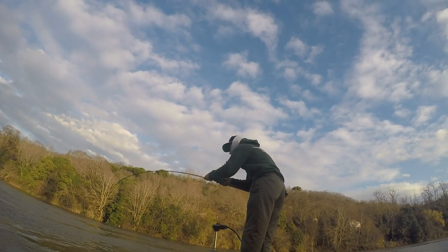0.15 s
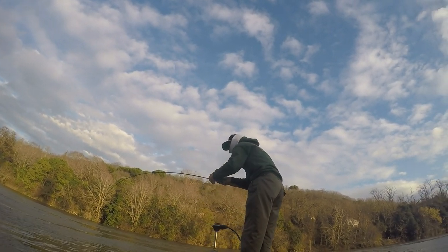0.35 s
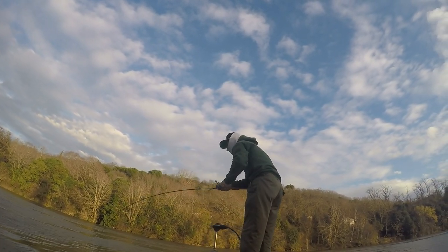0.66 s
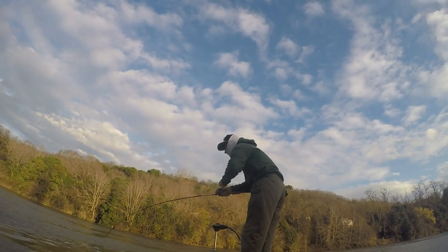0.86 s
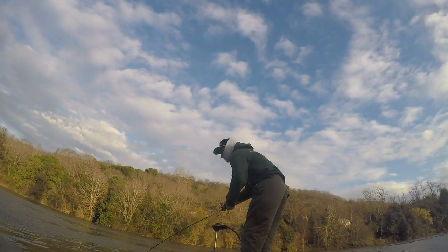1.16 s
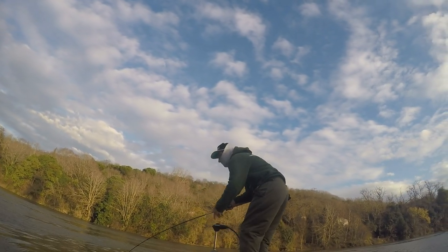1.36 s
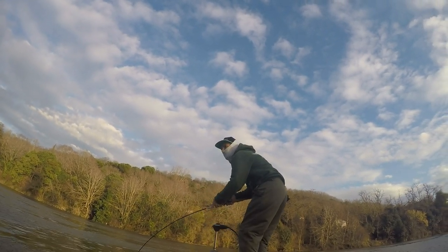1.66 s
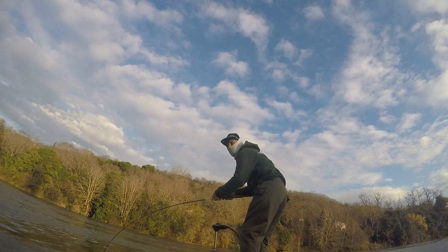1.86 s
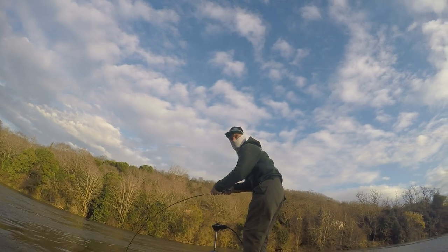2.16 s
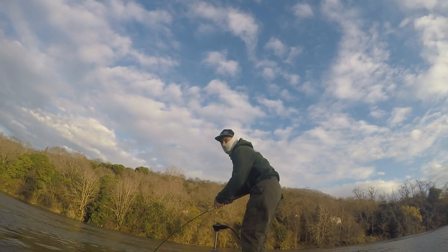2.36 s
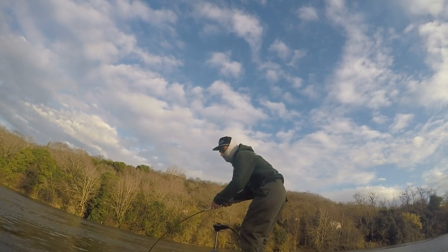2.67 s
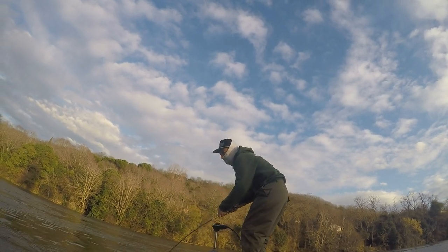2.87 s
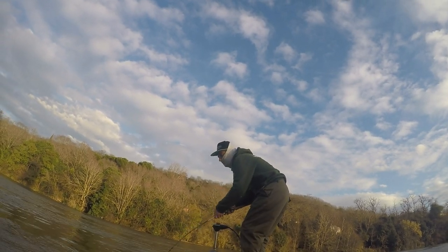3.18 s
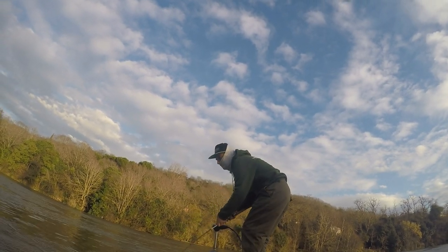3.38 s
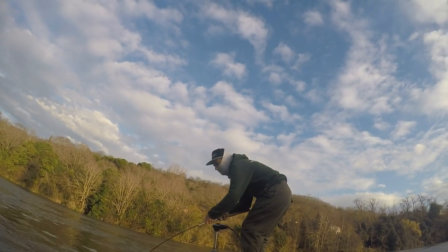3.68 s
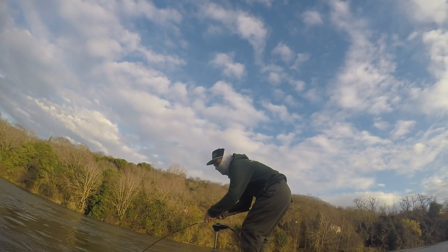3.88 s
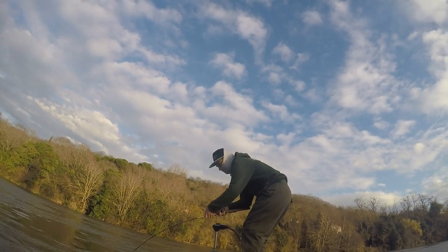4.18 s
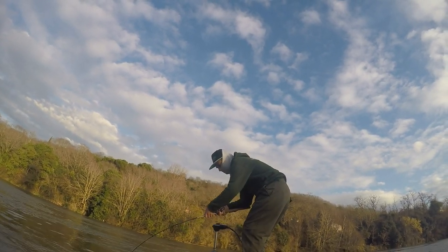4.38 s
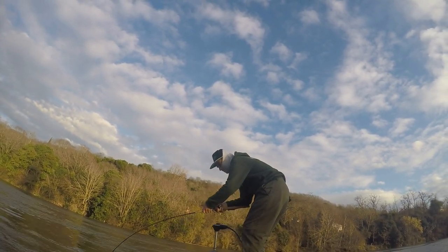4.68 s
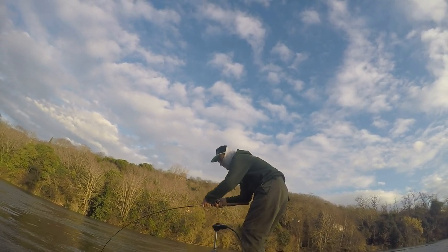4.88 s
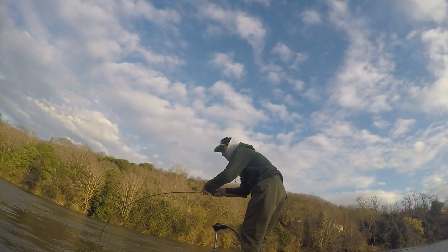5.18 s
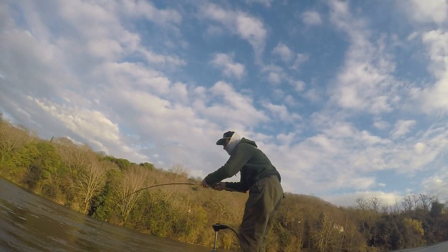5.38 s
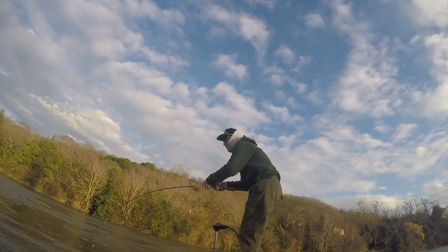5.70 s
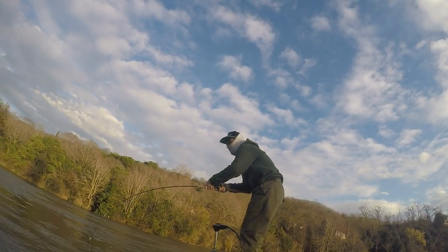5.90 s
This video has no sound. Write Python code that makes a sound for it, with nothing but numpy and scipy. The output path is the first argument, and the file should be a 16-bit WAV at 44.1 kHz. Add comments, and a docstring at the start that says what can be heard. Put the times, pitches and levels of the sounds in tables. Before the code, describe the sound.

Close to a microphone sealed in a case on a boat, a fishing reel whirs in uneven grinding surges, its metal gears clicking densely. Around two seconds it falters into short clicks and ticks. A low mount hum wavers beneath, and knocks and a deep thump travel through the hull. A quiet stretch of soft river wash and hiss follows, then a late cluster of thumps as weight shifts.

```python
"""A baitcasting reel is cranked in a small boat on a river, heard by a camera in a closed case on a hull mount.
Its gears whirr in surges, then falter and stop: random tooth clicks ring the frame and side plates.
The line guide ticks, the mount hums as a wavering sine, and the hull shakes under the angler.
Knocks travel along the hull, treble first. Coloured noise makes the far river and road wash and the hiss."""
import sys
import numpy as np
from scipy import signal
from scipy.io import wavfile
from scipy.ndimage import uniform_filter1d

SR = 44100
rng = np.random.default_rng(int(sys.argv[2]) if len(sys.argv) > 2 else 0)


def log_audio(samples):
    """Write samples as a 16-bit WAV file to the path given in sys.argv[1]."""
    # one column per channel
    frames = np.atleast_2d(samples).T
    # limit to full scale, then quantise
    limited = np.clip(frames, -1, 1)
    pcm = np.round(limited * 32767).astype(np.int16)
    wavfile.write(sys.argv[1], SR, pcm)


N = 266628
T = np.arange(N) / SR  # time of every sample in seconds


def amp(db):
    """Turns dB into a gain."""
    return 10 ** (np.asarray(db) / 20)


def evened(x):
    """Scales a sound to an rms of 1."""
    return x / np.sqrt(np.mean(x ** 2) + 1e-20)


def follow(rows):
    """Joins rows of (seconds, dB) into a gain for every sample, practically silent outside their span."""
    s, db = np.transpose(rows)
    return amp(np.interp(T, s, db, left=-120, right=-120))


def add(mix, s, sound):
    """Lays a sound into the mix at s seconds."""
    start = max(round(s * SR), 0)
    part = mix[start:][:len(sound)]
    part += sound[:len(part)]


def resonate(x, hz, width):
    """A resonance of gain 1: shifts hz down to zero, smooths, and shifts back."""
    turn = np.exp(2j * np.pi * hz * np.arange(len(x)) / SR)
    r = np.exp(-np.pi * width / SR)
    smooth = signal.lfilter([1 - r], [1, -r], x / turn)
    return 2 * (turn * smooth).real


def drift(per_s):
    """Slow random wandering of rms 1: noise kept below per_s Hz."""
    b, a = signal.butter(2, per_s, fs=SR)
    return evened(signal.lfilter(b, a, rng.standard_normal(N)))


def noise(tone, patchy_db, size=1024):
    """Noise of rms 1 from random short-time spectra of the given colour, with drifting patches."""
    hz = np.fft.rfftfreq(size, 1 / SR)
    a, b, patches = rng.standard_normal((4 * N // size + 5, len(hz), 3)).T
    # smooth over neighbouring pitches, then over time
    patches = uniform_filter1d(patches, size=8, axis=0)
    patches = evened(uniform_filter1d(patches, size=10, axis=1))
    f, db = np.transpose(tone)
    colour_db = np.interp(np.log(hz + 1), np.log(f), db, left=-120, right=-120)
    spectra = (a + 1j * b) * amp(colour_db[:, None] + patchy_db * patches)
    sound = signal.istft(spectra, nperseg=size, noverlap=3 * size // 4)[1]
    return evened(sound[:N])


def body(x, modes):
    """A solid part rings at its modes: steep resonances of alternating sign; white noise keeps its level."""
    tick = np.arange(SR // 4) == 0
    ring = np.zeros(len(tick))
    for k, (hz, width, db) in enumerate(modes):
        # two passes make the resonance steep
        mode = resonate(resonate(tick, hz, width), hz, width)
        ring += (-1) ** k * amp(db) * evened(mode)
    return signal.oaconvolve(x, ring / np.linalg.norm(ring))[:N]


def contacts(per_s, spread_db):
    """Dense uneven clicks at random moments, per_s a second on average, scaled to rms 1."""
    size = amp(spread_db * np.minimum(rng.exponential(1, N), 5))
    size = size * rng.choice([-1., 1.], N)
    return evened(size * (rng.random(N) < per_s / SR))


def bursts(s, db, t60, rise):
    """A level that rises at each event and dies away, by 60 dB in t60 seconds."""
    level, t = np.zeros(N), np.arange(SR // 2) / SR
    for at, start_db, tail, up in np.broadcast(s, db, t60, rise):
        add(level, at, amp(start_db - 60 * t / tail) * (1 - np.exp(-t / up)))
    return level


def strikes(s, db):
    """One single-sample click at each event."""
    out = np.zeros(N)
    out[np.round(np.asarray(s) * SR).astype(int)] = amp(db)
    return out


def knock(rub, s, db, t60, rise, blow_db):
    """A first blow, stronger the sharper the contact, the contact itself, and a weaker, longer rattle."""
    blow = strikes(s, db + blow_db) * 0.0011 / np.interp(T, s, rise)
    contact = bursts(s, db, t60, rise)
    rattle = bursts(s, db - 17.5, 2.5 * t60, rise=0.03)
    return blow + rub * (contact + rattle)


def outdoors():
    """Far wash and microphone hiss are coloured noise; the camera electronics whine on one faint tone."""
    # Strength of the far wash. Each row: time in seconds, level in dB.
    wash_level = [(0.0, -57.5), (1.51, -52.5), (1.97, -58.5), (6.05, -58.5)]
    # Colour of the wash through the case. Each row: pitch in Hz, relative strength in dB per Hz.
    wash_tone = [(210, -2), (350, -7), (490, -10.5), (526, -14.5), (613, -17.5), (707, -18.5), (767, -11.5),
                 (960, -1.5), (1290, -12.5), (1660, -8), (2240, -16), (2450, -13.5), (4000, -36.5),
                 (5200, -49), (8800, -120)]
    # Colour of the microphone hiss. Each row: pitch in Hz, relative strength in dB per Hz.
    hiss_tone = [(1470, -19), (2500, -6), (3070, -0.5), (3860, -5), (6240, -7), (9140, -12.5), (14700, -16),
                 (15500, -28)]
    hiss_db, whine_db = -68.5, -87.5
    wash = follow(wash_level) * noise(wash_tone, .6)
    hiss = amp(hiss_db) * noise(hiss_tone, 0.29, size=512)
    whine = evened(resonate(rng.standard_normal(N), hz=8620, width=44))
    return wash + hiss + amp(whine_db) * whine


def mount():
    """The mount keeps ringing at its own pitch, wavering in level and phase, over deep rocking noise."""
    # Strength of the hum before it wavers. Each row: time in seconds, level in dB.
    hum_level = [(0.0, -43.5), (0.09, -28.5), (0.28, -28), (0.35, -37), (0.43, -23), (0.51, -32),
                 (0.6, -26), (0.69, -29), (0.76, -41), (0.82, -33), (1.16, -35), (1.35, -31), (1.46, -48),
                 (1.6, -22.5), (1.7, -25), (1.82, -44.5), (2.1, -42.5), (2.17, -30), (2.43, -39),
                 (2.7, -44.5), (2.92, -29), (3.0, -41), (3.12, -48), (3.3, -39.5), (3.6, -41.5),
                 (3.67, -50), (3.8, -35.5), (4.0, -56), (4.17, -44.5), (4.97, -41.5), (5.08, -57),
                 (5.18, -39.5), (5.3, -51), (5.6, -41), (6.04, -51)]
    # Strength of the deep rocking. Each row: time in seconds, level in dB.
    rock_level = [(0, -40), (.3, -33.5), (1.3, -31.5), (1.7, -38.5), (2.45, -38), (3.0, -36.5), (3.6, -47),
                  (5.3, -47.5), (5.7, -46), (6.05, -37)]
    # Colour of the rocking. Each row: pitch in Hz, relative strength in dB per Hz.
    rock_tone = [(8, -40), (20, -17), (30, -13), (43, -8), (62, -6.5), (72, -13), (95, -36)]
    mount_hz, waver_db, waver_per_s = 77, 1.5, 4.6
    turns = mount_hz * T + 0.29 * drift(1.98)
    hum = np.sqrt(2) * np.sin(2 * np.pi * turns)
    hum = hum * follow(hum_level) * amp(waver_db * drift(waver_per_s))
    return hum + follow(rock_level) * noise(rock_tone, 1.6, size=8192)


def hull():
    """Bending waves carry treble faster than bass, so each knock cracks first and booms after."""
    # Knocks and scuffs on the hull. Each row: start in seconds, level before the soft rise in dB,
    # bright modes in dB and bass in dB against that level, rise time in seconds.
    knocks = [(1.204, -53, -7, -4, .002), (1.546, -44, -5, -18, 0.0076), (1.814, -46, -7.5, 1, 0.0016),
              (2.400, -60.5, 10.5, -13, 0.0023), (2.615, -51.5, -8, 9.5, 0.0015),
              (2.635, -53, 7.5, 21, 0.027), (2.76, -48, 4, -15, 0.014), (2.81, -47, -6, -15, .015),
              (2.883, -30, -6, 1, 0.0035), (2.905, -43, -20, 19, 0.014), (3.0, -39, -13, -8, 0.013),
              (3.262, -53, 3.5, -19, 0.0026), (3.293, -55.5, -7, 2.5, 0.0015),
              (3.338, -53.5, 4.5, -17, 0.0019), (3.496, -40, -10, -31, 0.012),
              (3.959, -45.5, 5.5, -19, 0.019), (5.545, -44, -10, -20, 0.011),
              (5.668, -40.5, -13, 2, 0.0063), (5.699, -52.5, 6, 10, 0.0051),
              (5.807, -43.5, -6.5, 14.5, 0.0023), (5.834, -46.5, -1, 14.5, 0.0043),
              (5.891, -47, -14, 7.5, 0.002), (5.930, -47, -6, 6.5, 0.0031)]
    # Ringing modes of the hull. Each row: pitch in Hz, width of one filter pass in Hz, relative level in dB.
    low_modes = [(150.4, 18.4, -1), (180.7, 18.6, -1.5), (295.5, 72, -8)]
    mid_modes = [(433, 1100, -10), (577, 200, 11.5), (823, 70, -1), (930, 120, 7.5)]
    bright_modes = [(1220, 145, -6.5), (1580, 196, 0), (2030, 47, -11)]
    # The whole hull thumps as weight shifts.
    # Each row: start in seconds, level before the soft rise in dB, rise time in seconds.
    thumps = [(2.342, -13, 0.0073), (2.9, -28, .005), (5.704, -26.5, 0.014), (5.864, -15.5, 0.011),
              (5.97, -18.5, 0.013)]
    # Steady shaking of the hull. Each row: time in seconds, level in dB.
    shake_level = [(0, -45), (1.0, -44), (1.8, -45), (2.8, -50.5), (3.6, -52), (5.4, -53), (6.05, -48)]
    # Colour of the shaking. Each row: pitch in Hz, relative strength in dB per Hz.
    shake_tone = [(60, -12), (100, -8), (135, -18), (178, -8), (216, -26), (290, -19), (400, -35),
                  (600, -28.5), (800, -33), (1300, -35.5), (1800, -49)]
    bass_delay = 0.00473  # s
    thump_hz, thump_t60 = 59.9, 0.31  # Hz, s

    s, db, bright_db, bass_db, rise = np.transpose(knocks)
    t60 = 0.099 + 1.45 * rise  # s; softer contacts last longer
    rub = contacts(6000, spread_db=4.0)
    middle = knock(rub, s, db, t60, rise, blow_db=30)
    bright = knock(rub, s, db + bright_db, t60, rise, blow_db=24.5)
    bass = knock(rub, s + bass_delay, db + bass_db, t60, rise, blow_db=36)
    out = follow(shake_level) * noise(shake_tone, 2.07, size=4096)
    out = out + body(middle, mid_modes) + body(bright, bright_modes) + body(bass, low_modes)
    t = np.arange(SR // 2) / SR
    for at, thump_db, up in thumps:
        swell = amp(thump_db - 60 * t / thump_t60) * (1 - np.exp(-t / up))
        add(out, at, swell * np.sin(2 * np.pi * thump_hz * t))
    return out


def guide():
    """Each line guide tick is a few clicks that ring the guide and carry a wide sharp edge."""
    # Small metal ticks. Each row: start in seconds, level before the soft rise in dB,
    # sharp edge in dB against that level.
    ticks = [(1.498, -60, 7), (1.685, -51, -18), (2.276, -47.5, -15), (2.782, -53.5, -10), (2.85, -55, -17),
             (2.957, -55.5, -16), (3.236, -58, -10), (3.272, -53, -13), (3.336, -52, -12), (3.455, -59, -6),
             (3.4915, -52, -3)]
    # Ringing modes of the guide. Each row: pitch in Hz, width of one filter pass in Hz, relative level in dB.
    guide_modes = [(4700, 820, 2), (7070, 1300, -7)]
    tick_t60 = 0.058  # s
    s, db, edge_db = np.transpose(ticks)
    clicks = contacts(1100, spread_db=2.8)
    edge = bursts(s, db + edge_db, tick_t60, rise=.004) * clicks
    b, a = signal.butter(2, 5500, "high", fs=SR)
    edge = signal.lfilter(b, a, edge)
    ticking = bursts(s, db, tick_t60, rise=0.0058) * clicks + strikes(s, db + 5)
    return body(ticking, guide_modes) + edge


def reel():
    """Tooth contacts ring frame and plates; bites add a click and a short surge, slack cuts the rattle."""
    # Cranking effort. Each row: time in seconds, gear rattle level in dB before drift, bites and slack.
    crank = [(0.0, -55), (0.22, -54.5), (0.35, -42.5), (0.6, -47), (0.95, -43.5), (1.25, -40), (1.4, -43.5),
             (1.68, -47.5), (1.715, -82)]
    # The gears bite. Each row: start in seconds, added rattle before the soft rise in dB,
    # time to die away by 60 dB in seconds.
    bites = [(0.071, -51, 0.34), (0.2853, -42, 0.044), (.322, -47, 0.13), (0.539, -40, 0.12),
             (0.609, -36.5, 0.038), (0.654, -36.5, 0.062), (0.712, -39.5, 0.045), (0.792, -36.5, 0.032),
             (0.950, -50, 0.04), (0.993, -33, 0.067), (1.083, -44, 0.13), (1.232, -37, 0.2),
             (1.348, -45, 0.26), (1.451, -35, 0.072), (1.534, -29.5, 0.088), (1.6235, -36.5, 0.046),
             (1.852, -49.5, 0.083), (1.8855, -46, 0.022), (1.901, -43.5, 0.038), (1.958, -49.5, 0.037),
             (2.0685, -43, 0.084), (2.127, -52.5, 0.032), (2.2807, -46.5, 0.04), (2.301, -40.5, 0.066),
             (2.319, -38.5, 0.092), (2.7824, -46, 0.082), (2.848, -43.5, 0.043), (3.4545, -49.5, 0.06),
             (3.484, -44.5, 0.054)]
    # The gears run slack for a moment. Each row: middle in seconds, depth in dB,
    # time from the middle to about a third of the depth in seconds.
    slack = [(0.479, 8, 0.02), (0.638, 7, 0.013), (0.701, 9, 0.01), (1.066, 7, 0.02), (1.175, 11.5, 0.017),
             (1.43, 3, 0.017), (1.495, 6, 0.024), (1.599, 6.5, 0.026)]
    # Ringing modes of the reel frame, then of the side plates, which ring when the gears bite hard.
    # Each row: pitch in Hz, width of one filter pass in Hz, relative level in dB.
    frame = [(2308, 960, 2.5), (2616, 184, 3), (2958, 525, 5.5), (3456, 500, -1), (3712, 104, -6.5),
             (3930, 750, -15)]
    plates = [(4470, 54, -0.5), (4310, 1400, 6.5), (5480, 180, -3.5), (6370, 510, -3), (7060, 290, -9)]
    # Line guide and idle gears rustle after the cranking. Each row: time in seconds, level in dB.
    rustle = [(1.7, -62), (2.09, -75), (2.29, -60.5), (3.12, -75.5), (3.33, -61.5), (3.7, -82)]
    # A thin whir near the reel that fades. Each row: time in seconds, level in dB.
    whir_level = [(0, -66), (1.3, -65), (1.7, -69), (2.5, -71), (2.9, -80)]
    plates_db = -23  # plates against the rattle, when the rattle is at -40 dB
    plates_growth = 1.4  # the plates grow faster than the rattle

    s, db, t60 = np.transpose(bites)
    level = follow(crank) * amp(drift(35)) + bursts(s, db, t60, rise=0.0052)
    for middle, depth_db, length in slack:
        level = level * amp(-depth_db * np.exp(-((T - middle) / length) ** 2))
    plates_level = amp(plates_db - 40) * (level / amp(-40)) ** plates_growth
    teeth = contacts(1900, spread_db=2.7)
    clicks = strikes(s, db + 16)
    clicks = clicks + follow(rustle) * contacts(500, spread_db=3.5)  # idle gears tick sparsely
    whir = evened(resonate(rng.standard_normal(N), hz=1825, width=30))
    frame_ring = body(level * teeth + clicks, frame)
    plates_ring = body(plates_level * teeth, plates)
    return frame_ring + plates_ring + whir * follow(whir_level)


def scene():
    """All sources on one microphone."""
    return (outdoors() + mount() + hull() + guide() + reel())[None]


def record(dry):
    """Softens both ends, then removes what lies above the band limit."""
    edge_hz = 15600
    soft = dry * signal.windows.tukey(N, .002)
    low_pass = signal.firwin(511, edge_hz, window=("kaiser", 9), fs=SR)
    return signal.oaconvolve(soft, low_pass[None], "same")


dry = scene()
out = record(dry)
log_audio(out)
```